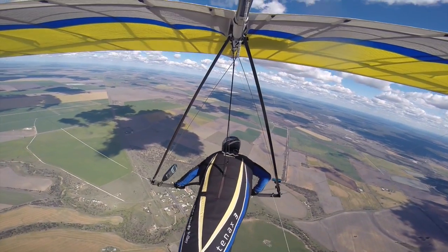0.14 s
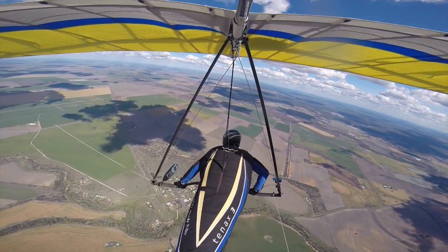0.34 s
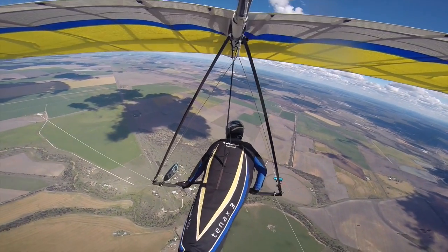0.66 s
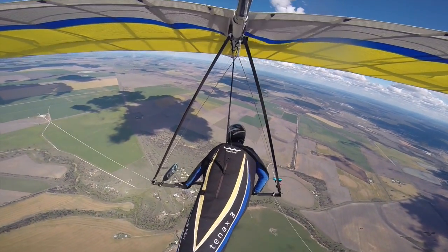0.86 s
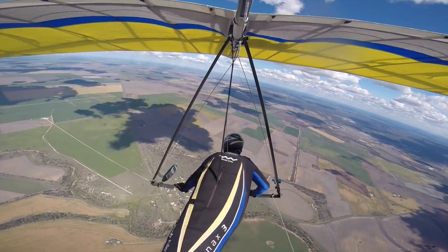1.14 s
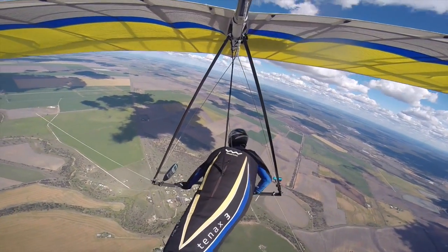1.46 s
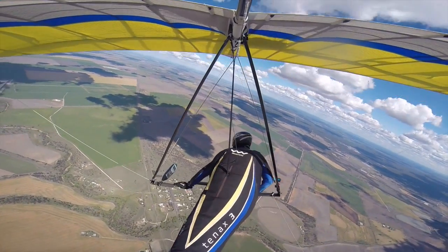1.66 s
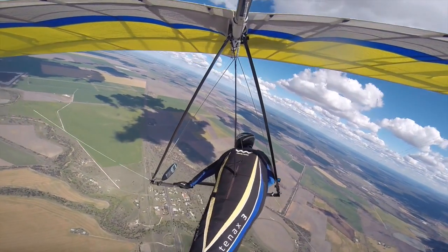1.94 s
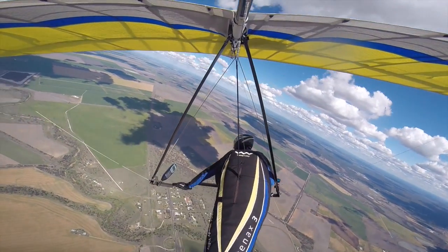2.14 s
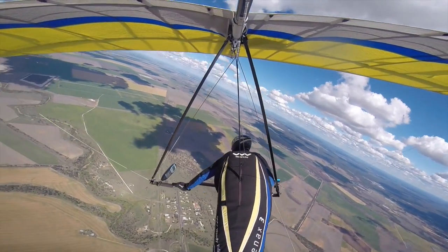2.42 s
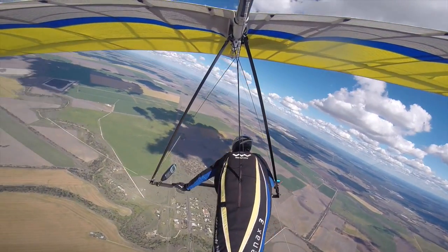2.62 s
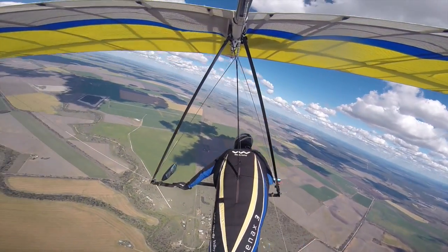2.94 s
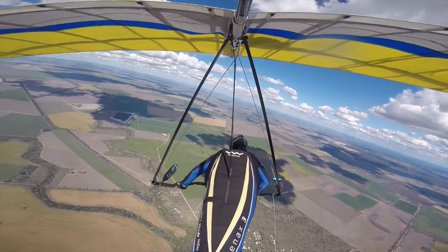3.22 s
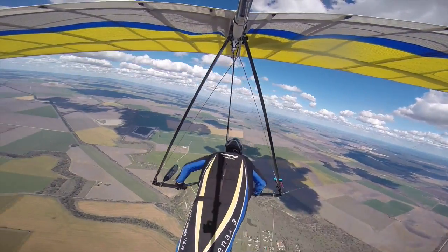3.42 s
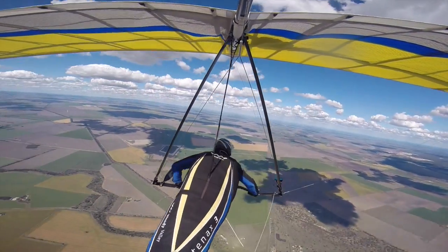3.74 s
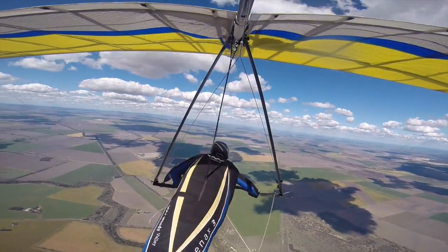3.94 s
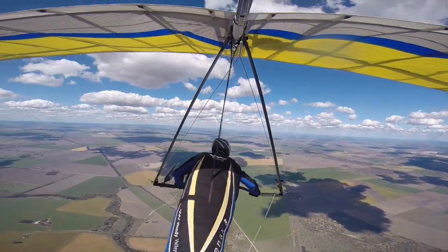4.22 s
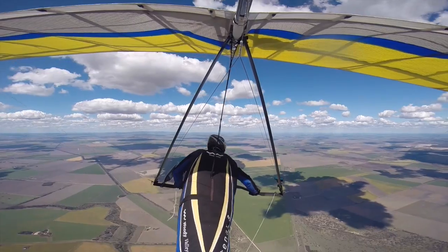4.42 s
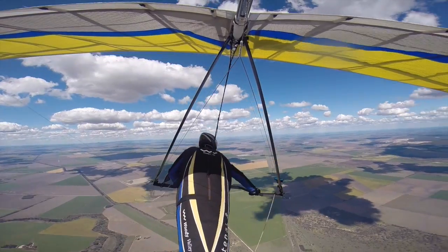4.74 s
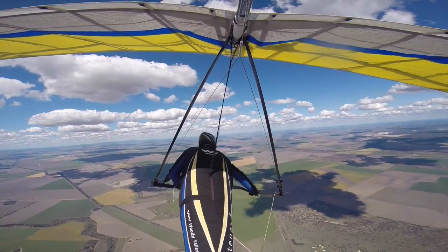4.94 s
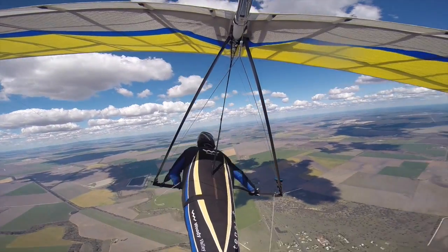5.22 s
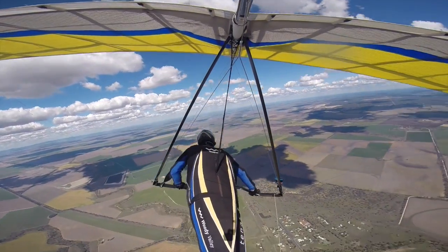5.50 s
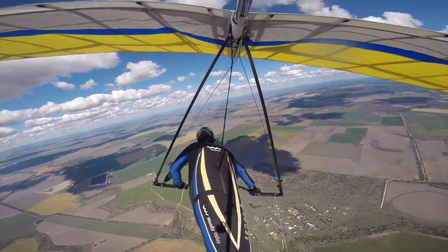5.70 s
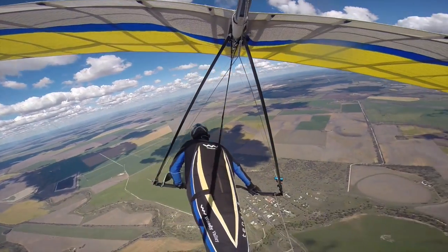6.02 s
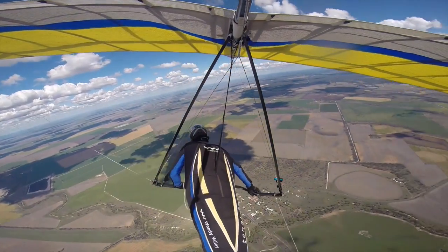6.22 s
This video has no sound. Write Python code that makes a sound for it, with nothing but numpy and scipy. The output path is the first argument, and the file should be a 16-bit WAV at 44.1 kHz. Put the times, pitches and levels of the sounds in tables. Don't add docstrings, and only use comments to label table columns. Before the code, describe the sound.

Loud, low wind buffeting pounds a microphone carried under a hang glider, with irregular thumps, airy hiss and a faint breathy whistle midway.

```python
import sys
import numpy as np
from scipy import signal
from scipy.fft import rfft, irfft, next_fast_len
from scipy.io import wavfile
from scipy.ndimage import uniform_filter1d

SR = 44100
rng = np.random.default_rng(int(sys.argv[2]) if len(sys.argv) > 2 else 0)


def invert_db(x):
    u = np.asarray(x, float) / 20
    return 10 ** u


def int16_out(signal):
    q = np.round(np.clip(np.atleast_2d(signal).T, -1, 1) * 32767)
    wavfile.write(sys.argv[1], SR, q.astype(np.int16))


N = 280476
TIME = np.arange(N) / SR
PADDED = next_fast_len(N)
BINS_HZ = np.arange(PADDED // 2 + 1) * SR / PADDED + 1e-3

# [t/s, airspeed level/dB, turbulence level/dB]
AIRFLOW = [(.75, -1.5, -0.5), (.97, 1, 3), (1.09, -1, 6), (1.19, 1.5, 1), (1.42, -3.5, -4.5),
           (1.62, 1.5, 1.5), (2.05, -0.5, 4), (2.4, 0, -0.5), (2.91, 1.5, 5.5), (3.2, -2.5, 0),
           (3.48, 4, 4.5), (3.75, 5.5, 6), (3.95, 0.5, 2.5), (4.8, 0.3, 0.7), (5.0, -1.5, 0),
           (5.72, -4, 0.5), (6.0, -7.5, -2.5), (6.2, -4.5, -4.5)]
# [t/s, signed peak/full scale, width/ms, gain drop/dB]
SLAPS = [(0.0623, 0.71, 1.26, 1), (0.1513, -0.56, 1.6, 0.5), (0.3905, 0.76, 1.6, 2.5),
         (0.5054, -0.76, 2.2, 1), (0.9892, 1.0, 1.02, 12), (1.2208, -0.44, 1.6, 4), (1.2642, 0.78, 2.5, 3),
         (1.9385, 0.7, 2.1, 4), (2.092, 0.82, 1.9, 3.5), (2.1562, 0.75, 1.1, 2.5), (2.2919, -0.69, 2.8, 4),
         (2.6269, -0.85, 1.54, 4.5), (2.805, 0.59, 1.8, 4), (2.9233, 0.91, 2, 6.5), (3.125, -0.49, 2.6, 3),
         (3.2952, -0.42, 3.6, 2), (3.328, 0.81, 2.3, 7), (3.4049, -0.75, 1.4, 3.5), (3.529, 0.91, 3.3, 8),
         (3.6625, -0.72, 3.4, 5), (3.7132, -0.84, 2.8, 5.5), (3.8869, -0.67, 4.2, 3),
         (4.0233, -0.77, 2.2, 5), (4.206, -0.67, 4.4, 3.5), (4.649, -0.21, 2.8, 1),
         (5.4625, -0.8, 2.2, 5.5), (5.5585, -0.67, 1.5, 3.5), (5.7686, -0.47, 2.8, 4),
         (5.8215, -0.89, 2.3, 7.5), (6.0825, -0.75, 1.74, 4.5)]
# [t/s, signed peak/full scale, width/ms]
THUMPS = [(.6298, 0.63, 1.14), (0.814, 0.68, 3.6), (1.299, 0.8, 1.44), (1.667, 0.66, 1.7),
          (1.723, 0.33, 1.6), (1.826, 0.77, 1.5), (1.9644, 0.85, 1.95), (2.451, 0.9, 1.9),
          (2.6498, -0.67, 2.4), (3.0386, 0.75, 1.55), (3.8258, -0.71, 2.16), (4.1736, 0.65, 4.3),
          (4.4866, -.58, 4), (4.6699, .67, 2), (4.927, 0.94, 3.5), (5.097, -.73, 3.2), (5.2228, 0.62, 4.3),
          (5.285, -0.93, 2.9), (5.3682, 0.98, 1.54), (5.3984, -0.82, 1.85), (5.4287, -0.76, 1.5),
          (5.5346, -0.62, 3.6), (6.2055, 0.76, 2.1)]
THUMP_DROP_DB = 0.95
BLOWS = list(SLAPS) + [(*thump, THUMP_DROP_DB) for thump in THUMPS]
# [f/Hz, density level/dB per Hz]
BUFFET_SPECTRUM = [(6, -59.5), (12, -43.5), (20, -42.5), (35, -32), (70, -35), (105, -35.5), (150, -38.5),
                   (220, -42.5), (330, -48.5), (500, -54.5), (750, -58.5), (1050, -61.5), (1500, -75.5),
                   (6000, -135)]
# [t/s, level change/dB, width/ms]
BURSTS = [(.106, 7, 20), (.191, -6.5, 52), (.238, 6, 26), (.343, 9, 28), (0.586, 11.5, 48), (.7, 7, 25),
          (1.098, -12, 99), (1.383, 15, 35), (1.564, 7, 25), (1.619, -7, 53), (1.702, 14, 27),
          (1.994, -11, 38), (2.066, -8, 48), (2.476, 3, 51), (2.88, 7.5, 61), (3.206, 9.5, 30),
          (3.26, 7, 16), (3.819, 16.5, 25), (4.354, 4, 130), (4.413, -10, 46), (4.501, 6, 71),
          (4.79, 16, 36), (4.83, 9, 16), (5.113, -18, 29), (5.408, 7, 59), (5.445, -18, 27), (5.502, 9, 14),
          (5.945, 6.5, 23), (6.015, -3, 60), (6.146, 11, 24)]
# [t/s, peak level/dB, f/Hz]
POPS = [(0.104, -12, 401), (0.388, -21, 460), (0.548, -23, 641), (0.582, -10, 458), (0.911, -19, 514),
        (0.988, -10, 405), (1.159, -17, 404), (1.382, -21, 460), (1.935, -17, 460), (2.133, -15, 406),
        (2.216, -9.5, 480), (2.278, -23, 640), (2.473, -29, 401), (2.648, -13, 401), (2.717, -13, 401),
        (2.777, -21, 533), (3.28, -18, 595), (3.321, -6, 460), (3.972, -16, 630), (4.009, -15, 557),
        (4.786, -10, 406), (4.826, -7, 428), (5.239, -14, 692), (5.556, -17, 401)]
# [f/Hz, density level/dB per Hz]
HISS_SPECTRUM = [(700, -95), (1400, -73), (1700, -72.5), (2100, -71.5), (2600, -75.5), (3300, -77),
                 (4000, -84.5), (5500, -89.5), (6300, -86), (8000, -92.5), (9700, -104), (11500, -106),
                 (13000, -112), (15000, -118)]
# [f/Hz, width/Hz, rms level/dB]
PORT_MODES = [(8740, 640, -58.5), (10400, 590, -74)]
# [t/s, strength level/dB]
WHISTLE_STRENGTH = [
    (2.6, -19),
    (2.9, -6),
    (3.35, -2),
    (3.85, 4.5),
    (4.05, 6),
    (4.86, 4.5),
    (4.92, -3),
    (5.3, -12),
    (5.6, -17),
]
# [f/Hz, width/Hz, rms level/dB]
EDGE_TONES = [(5170, 500, -61), (6020, 600, -56.5)]
# [t/s, f/Hz, half length/s, level/dB]
STRAP_BLIPS = [
    (6.205, 3350, .005, -48),
    (6.221, 3120, .009, -43.5),
]


def buffet(rumble_db, eddy_db, gust):
    lone_share = .4
    drive = np.sqrt(1 - lone_share) * rng.standard_normal(PADDED)
    drive = drive + np.sqrt(lone_share) * eddies(rate=300, scatter_db=2.5)
    out, shared = 0, walk(14)
    for hz, band in bands(drive, colour(BUFFET_SPECTRUM), low_hz=27, count=14):
        up = np.clip(np.log(hz / 90) / np.log(350 / 90), 0, 1)
        shared = 0.86 * shared + np.sqrt(1 - 0.89 ** 2) * walk(14)
        level_db = (0.5 - up) * rumble_db + up * (eddy_db + 0.8 * gust)
        level_db = level_db + (.5 + 0.77 * up) * shared + 0.48 * up * walk(30)
        out = out + band * invert_db(level_db)
    return out


def eddies(rate, scatter_db):
    when, size, side = rng.random((3, PADDED))
    strength = invert_db(np.minimum(-scatter_db * np.log(size + 1e-9), 16))
    x = (when < rate / SR) * np.sign(side - .5) * strength
    return x / np.std(x)


def flurries():
    db_per_drop, slap_ms = 1.7, 19.5
    swarms = [(s, db_per_drop * min(drop_db, 8), slap_ms) for s, _, _, drop_db in SLAPS]
    out = 0.41 * walk(4.6)
    for s, db, width_ms in list(BURSTS) + swarms:
        near, t = around(s, .1)
        out[near] += 0.82 * db * np.exp(-(t / (0.00029 * width_ms)) ** 2)
    return out


def slaps():
    wave, taken, tick = np.zeros((3, N))
    for s, peak, width_ms, drop_db in BLOWS:
        near, t = around(s, .05)
        u = t / (width_ms / 1000) * np.where(t < 0, 1.15, .9)
        lobe = 1.49 * np.exp(-(u / 0.87) ** 2)
        suction = 0.6 * np.exp(-((u + 0.17) / 2.5) ** 2)
        wave[near] += peak * (lobe - suction)
        taken[near] = 1 - (1 - taken[near]) * (1 - 0.61 * np.exp(-(u / 1.44) ** 2))
        tick[near] += invert_db(2.2 * min(drop_db, 9)) * np.exp(-((t - .0006) / 0.00088) ** 2)
    return wave + tick * resonance(4300, 4000, -59.0), taken


def gain_control():
    release_s, attack_s = 0.13, 0.0009
    drop_db = np.zeros(N)
    for s, _, _, db in BLOWS:
        drop_db[int((s + .0005) * SR)] += db
    hold, snap = np.exp(-1 / (release_s * SR)), np.exp(-1 / (attack_s * SR))
    recovering = signal.lfilter([1], [1, -hold], drop_db)
    return invert_db(-signal.lfilter([1 - snap], [1, -snap], recovering))


def pops():
    out, turn = np.zeros(N), rng.random(len(POPS))
    for (s, db, hz), p in zip(POPS, turn):
        near, t = around(s + .002, .012)
        envelope = np.exp(-(t * hz / np.where(t < 0, .45, .9)) ** 2)
        out[near] += invert_db(db - 4.5) * envelope * np.cos(2 * np.pi * (1.03 * hz * t + p))
    return out


def hiss(hiss_db, gust, flutter):
    cavity = sum(resonance(*mode) * invert_db(1.5 * walk(25)) for mode in PORT_MODES)
    singing_db, = curves(WHISTLE_STRENGTH)
    out = cavity * invert_db(-2.5 * invert_db(singing_db) + .4 * hiss_db)
    for hz, band in bands(rng.standard_normal(PADDED), colour(HISS_SPECTRUM), low_hz=970, count=9):
        follow = 0.14 + .5 * np.clip(1 - hz / 4500, 0, 1)
        speed_swing = .6 * np.clip(hz / 7000 - 1, 0, 1)
        out = out + band * invert_db(0.53 * walk(13) + follow * gust + speed_swing * hiss_db)
    return out * invert_db(hiss_db + 0.87 * flutter)


def whistle(hiss_db):
    peak_s, span_s, swing_db, rest_db = 4.1, .8, 22.5, -20
    top_hz, wander_hz, wander_s, high_s = 10400, 170, .68, 3.68
    main_db, = curves(WHISTLE_STRENGTH)
    main = sum(resonance(*tone) * invert_db(main_db + 1.2 * walk(9)) for tone in EDGE_TONES)
    sway = np.cos(2 * np.pi * (TIME - high_s) / wander_s)
    swell = np.exp(-((TIME - peak_s) / span_s) ** 2)
    top_db = rest_db + swing_db * swell + 2.5 * sway
    top = resonance(top_hz + wander_hz * sway, 470, -67) * invert_db(top_db + 1.5 * walk(15))
    return (main + top) * invert_db(hiss_db)


def squeak():
    out = np.zeros(N)
    for s, hz, half, db in STRAP_BLIPS:
        out += invert_db(db) * np.exp(-((TIME - s) / half) ** 2) * np.sin(2 * np.pi * hz * TIME)
    return out


def resonance(hz, width, db):
    lowpass = 1 + (2 * BINS_HZ / width) ** 2
    slow = [irfft(rfft(rng.standard_normal(PADDED)) / lowpass, PADDED)[:N] for _ in range(2)]
    phase = 2 * np.pi * np.cumsum(hz * np.ones(N)) / SR
    return (slow[0] * np.cos(phase) + slow[1] * np.sin(phase)) * invert_db(db) / np.std(slow)


def colour(points):
    hz, db = np.transpose(points)
    return invert_db(np.interp(np.log(BINS_HZ), np.log(hz), db)) * np.sqrt(SR / 2)


def bands(x, gain, low_hz, count):
    spectrum = rfft(x, PADDED) * gain
    place = np.clip(2 * np.log2(BINS_HZ / low_hz), 0, count - 1)
    for k in range(count):
        slope = np.cos(np.clip(place - k, -1, 1) * np.pi / 2) ** 2
        yield low_hz * 2 ** (k / 2), irfft(spectrum * slope, PADDED)[:N]


def walk(rate):
    k = int(SR / rate)
    held = np.repeat(rng.standard_normal(N // 200), k)[:N]
    return 1.3 * uniform_filter1d(uniform_filter1d(held, k), k)


def around(s, reach):
    near = slice(max(int((s - reach) * SR), 0), int((s + reach) * SR))
    return near, TIME[near] - s


def curves(table):
    s, *columns = np.transpose(table)
    return [np.interp(TIME, s, c) for c in columns]


def scene():
    hiss_db, eddy_db = curves(AIRFLOW)
    rumble_db = 0.48 + .12 * hiss_db + 0.22 * eddy_db
    gust, flutter, gain = flurries(), walk(35), gain_control()
    wave, taken = slaps()
    low = buffet(rumble_db, eddy_db + 1.37 * flutter, gust) * gain * invert_db(1.14)
    low = 0.74 * np.tanh(low / 0.76)
    high = (hiss(hiss_db, gust, flutter) + whistle(hiss_db)) * gain * invert_db(1.25)
    return (low * (1 - taken) + wave + pops() + high + squeak())[None]


def low_pass(x):
    return signal.sosfilt(signal.butter(12, 15140, fs=SR, output="sos"), x)


def record(dry):
    mix = np.clip(dry, -1, 1)
    return low_pass(mix)


dry = scene()
out = record(dry)
int16_out(out)
```